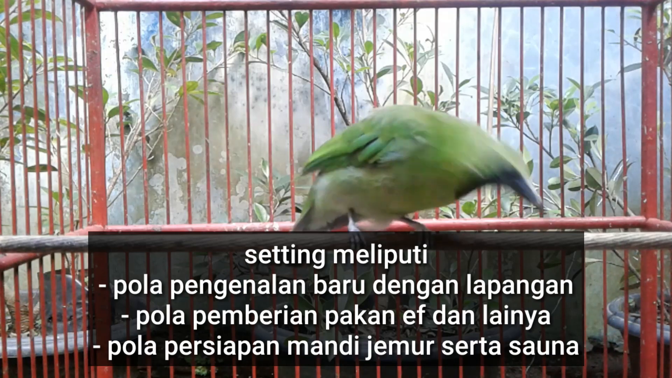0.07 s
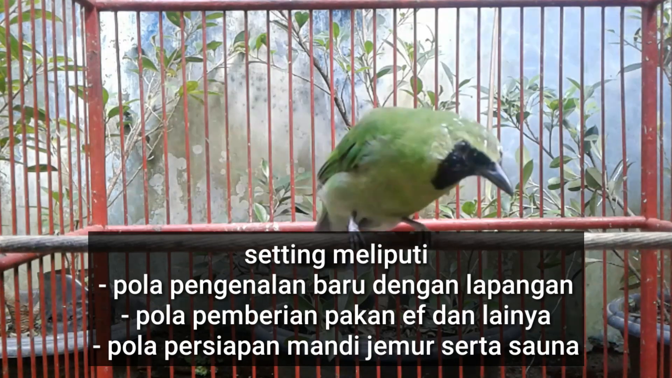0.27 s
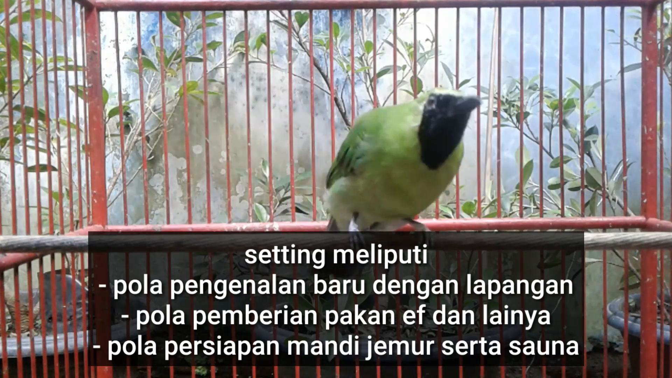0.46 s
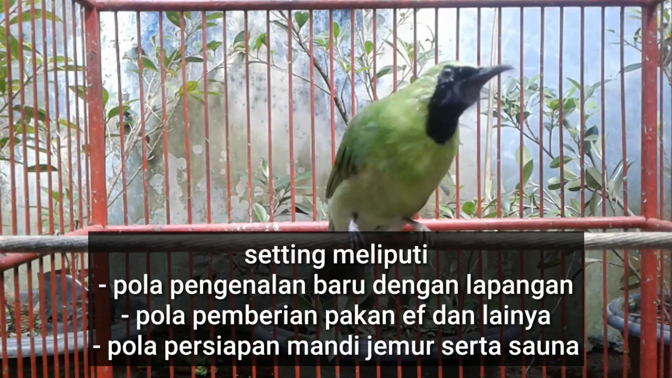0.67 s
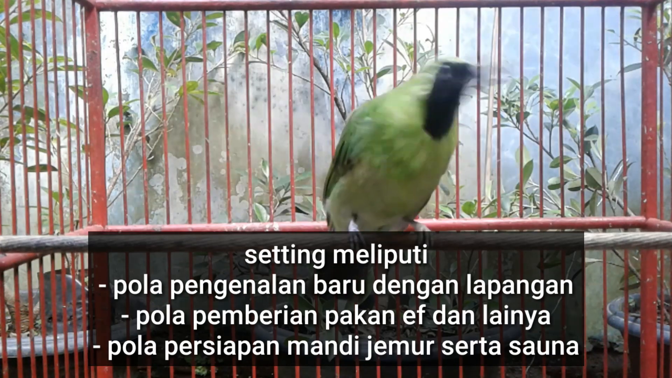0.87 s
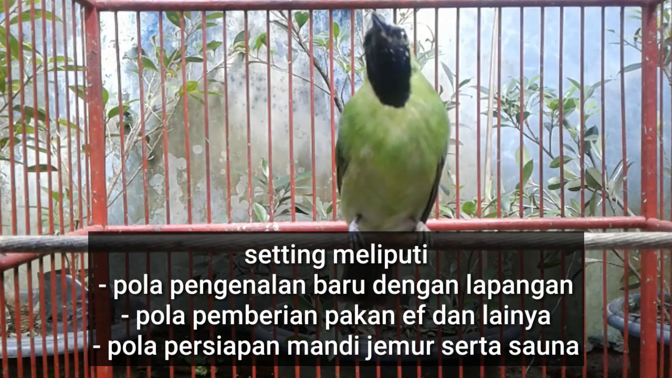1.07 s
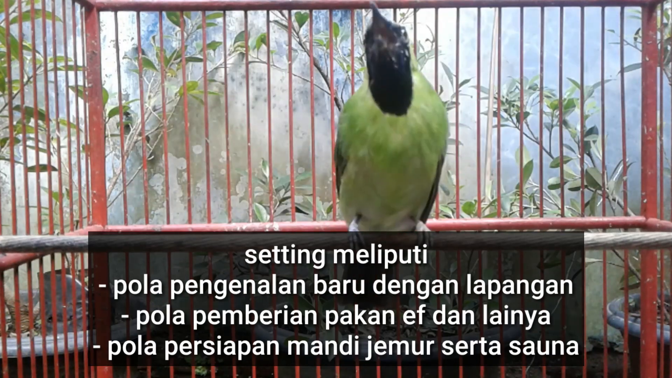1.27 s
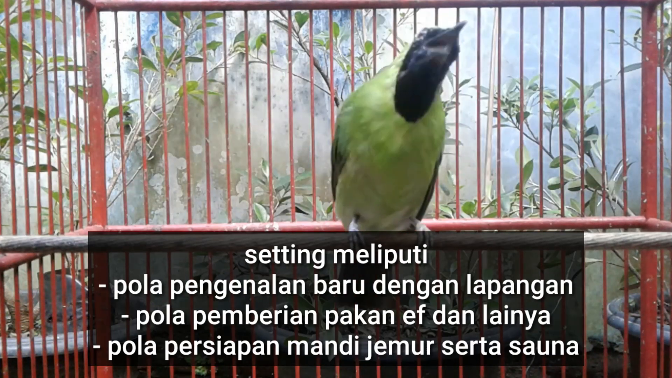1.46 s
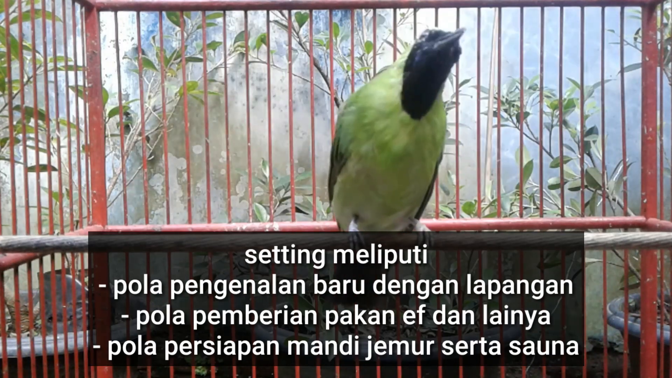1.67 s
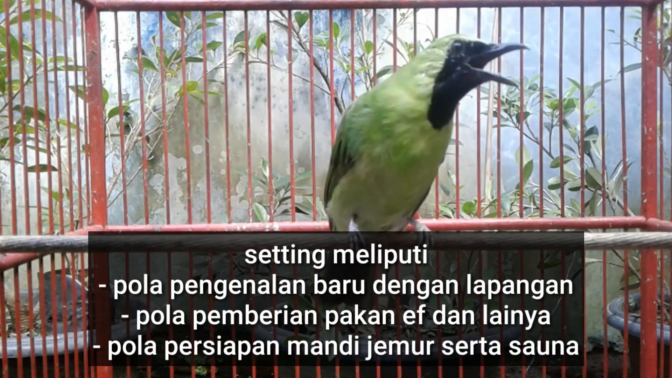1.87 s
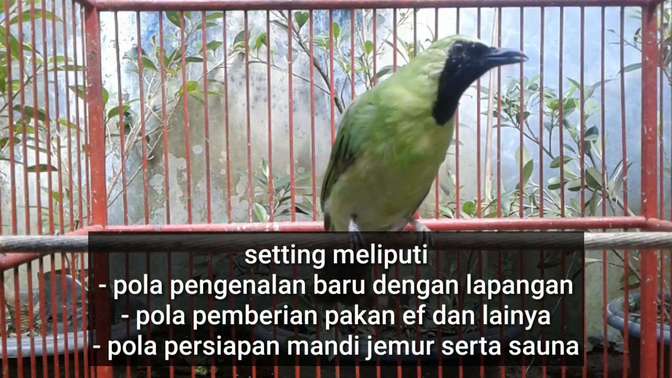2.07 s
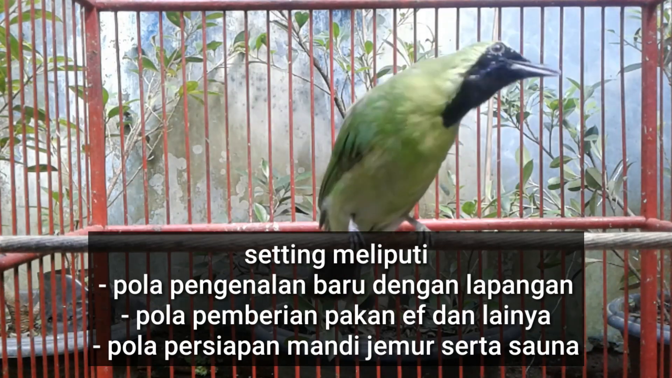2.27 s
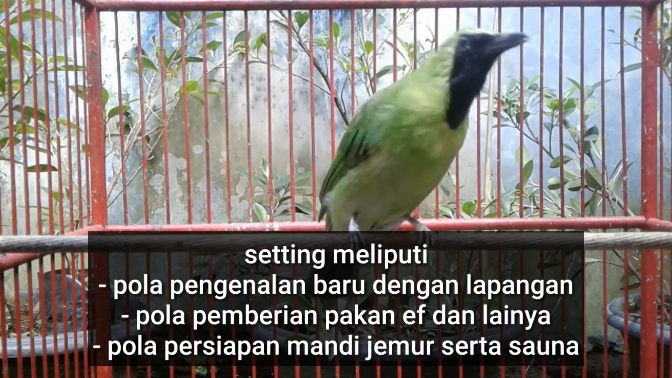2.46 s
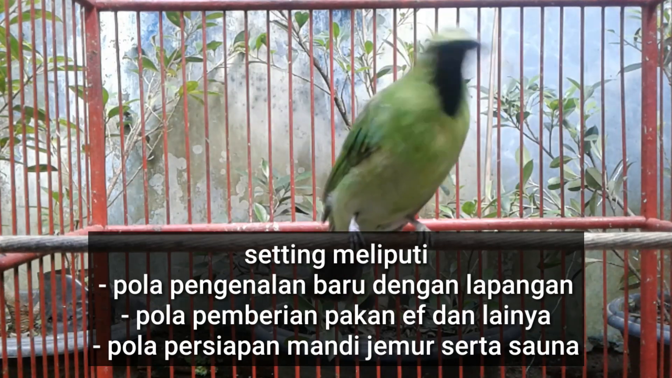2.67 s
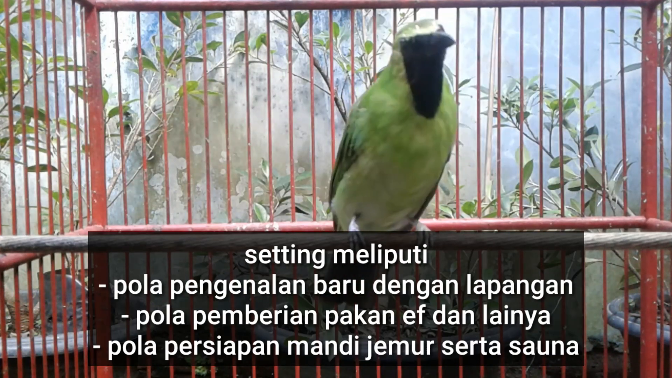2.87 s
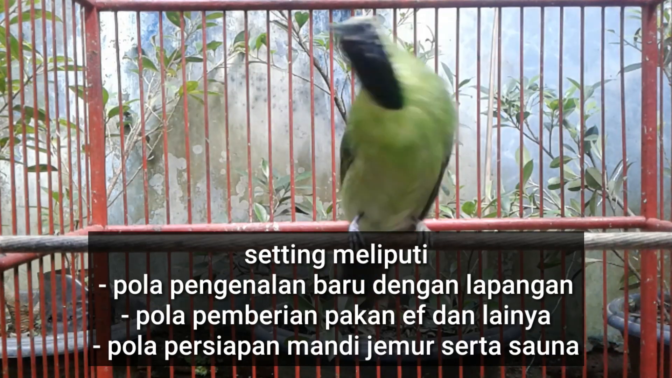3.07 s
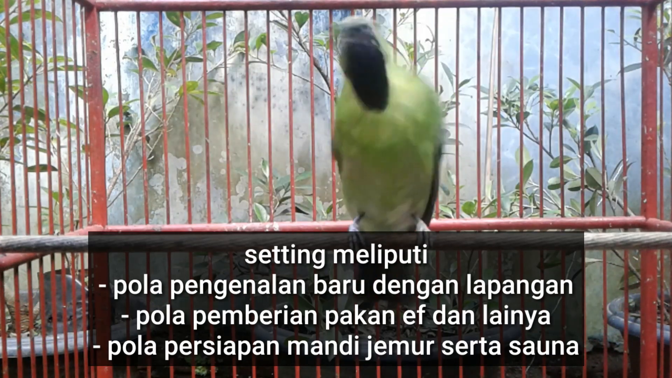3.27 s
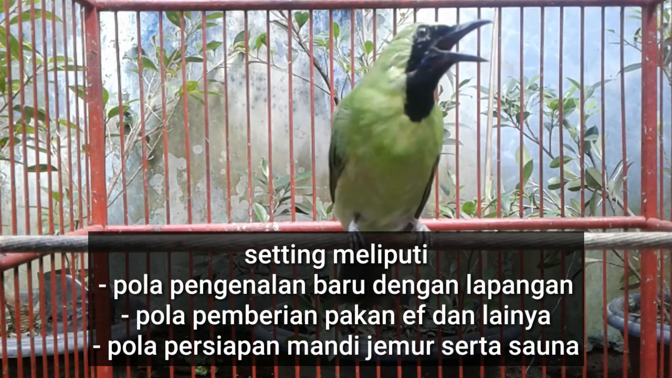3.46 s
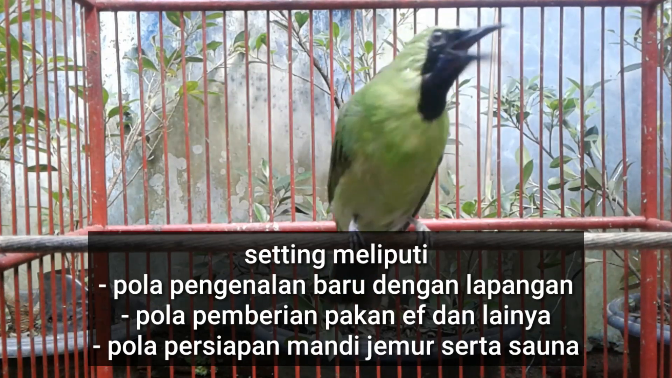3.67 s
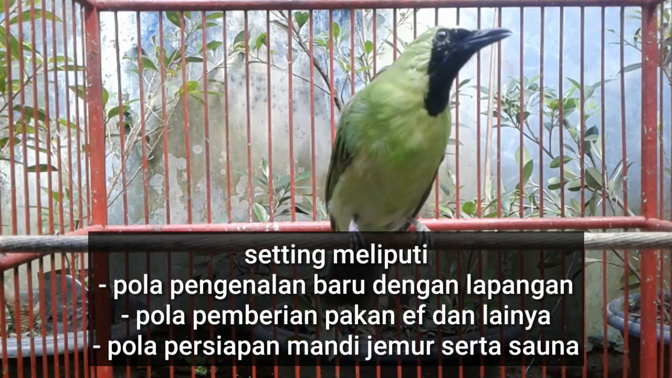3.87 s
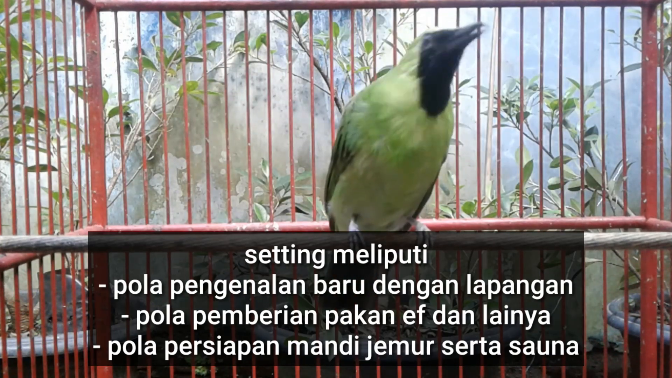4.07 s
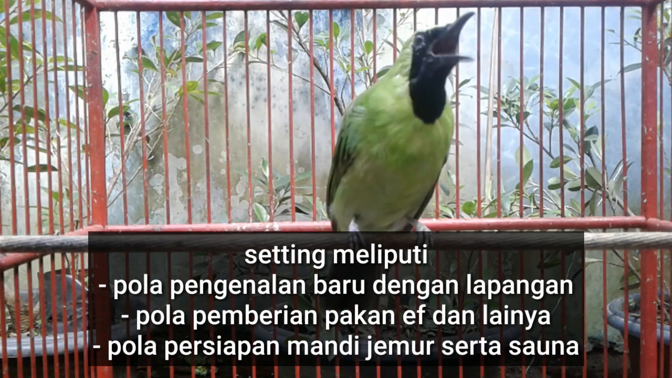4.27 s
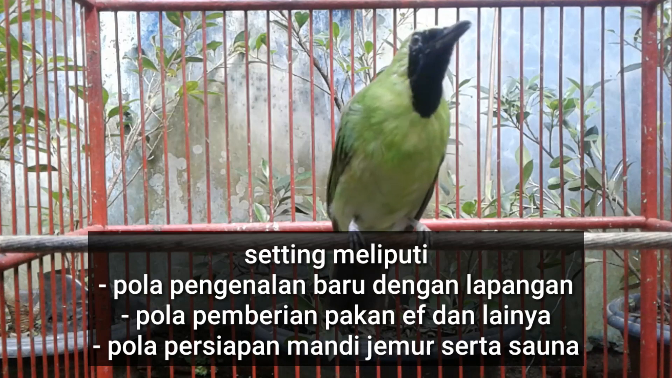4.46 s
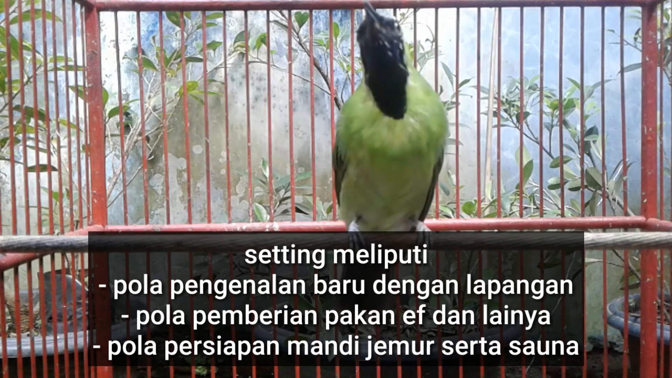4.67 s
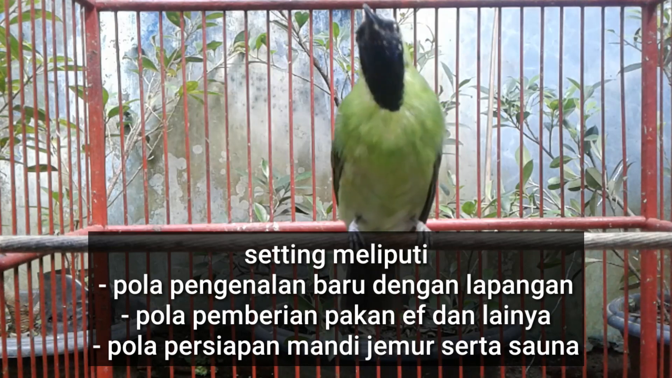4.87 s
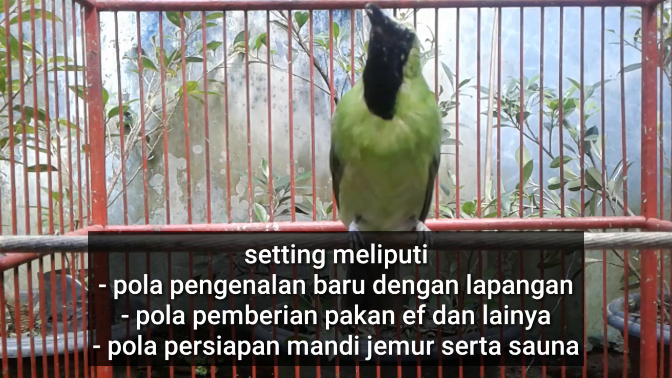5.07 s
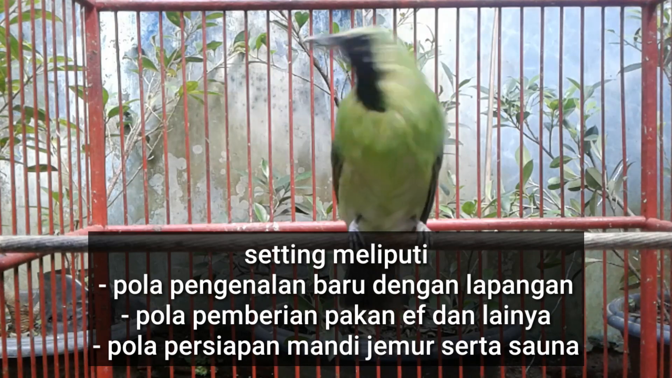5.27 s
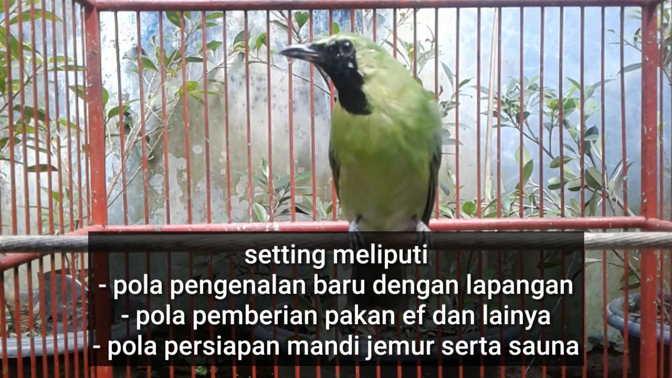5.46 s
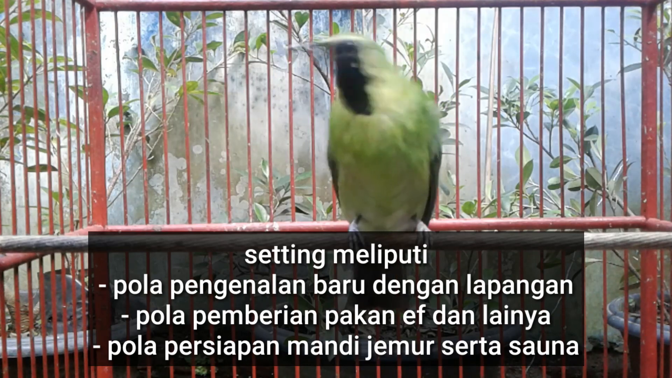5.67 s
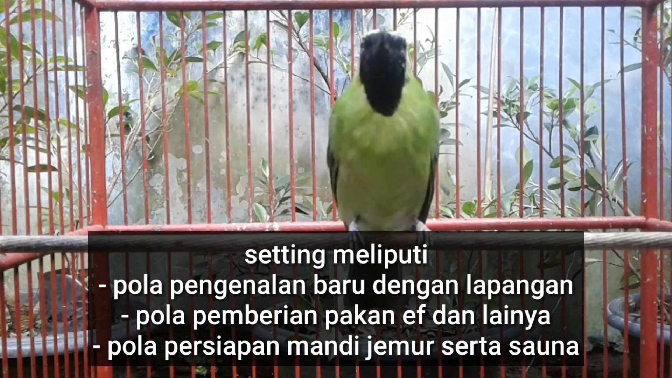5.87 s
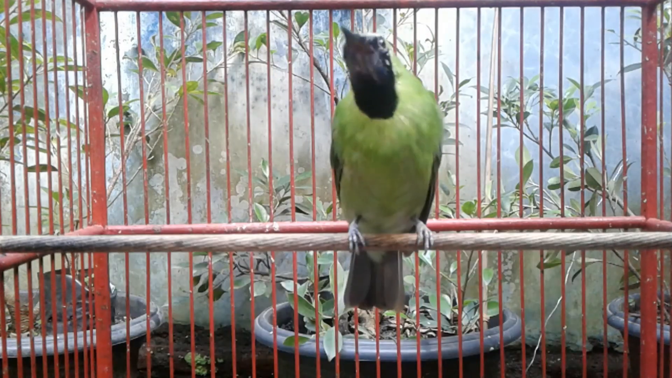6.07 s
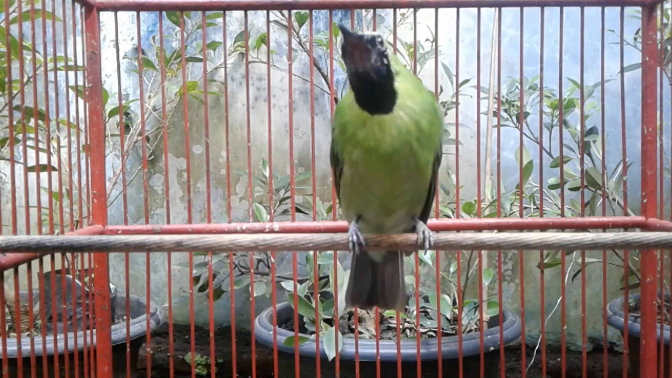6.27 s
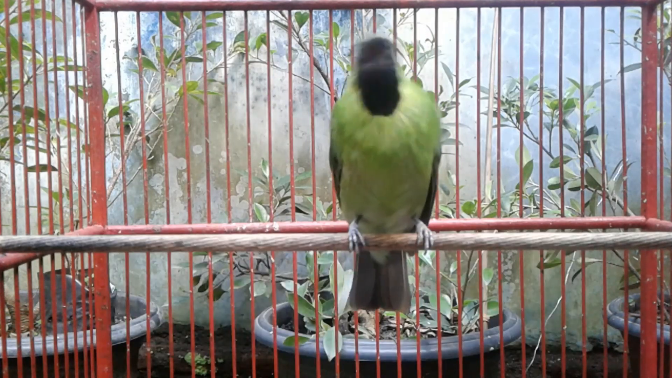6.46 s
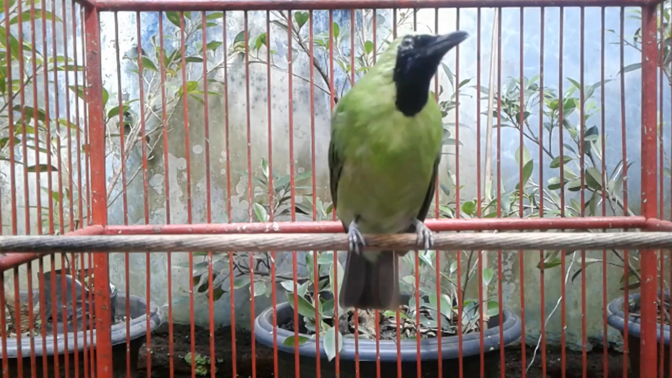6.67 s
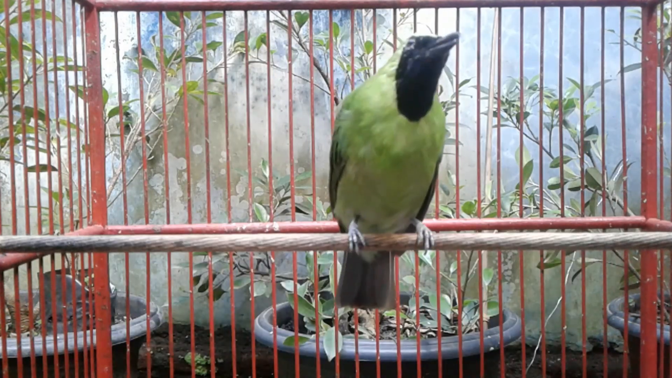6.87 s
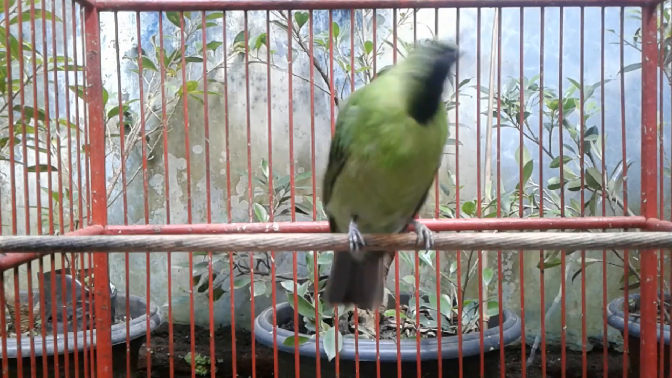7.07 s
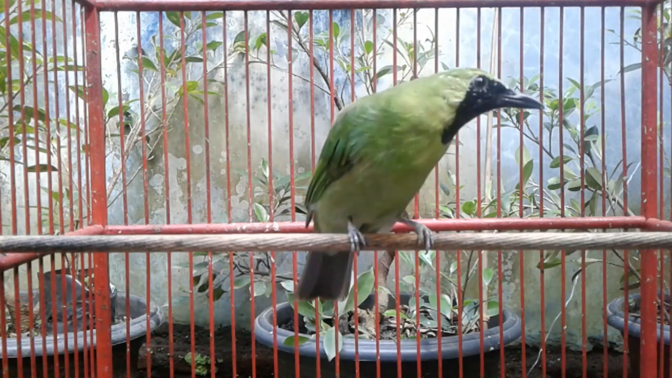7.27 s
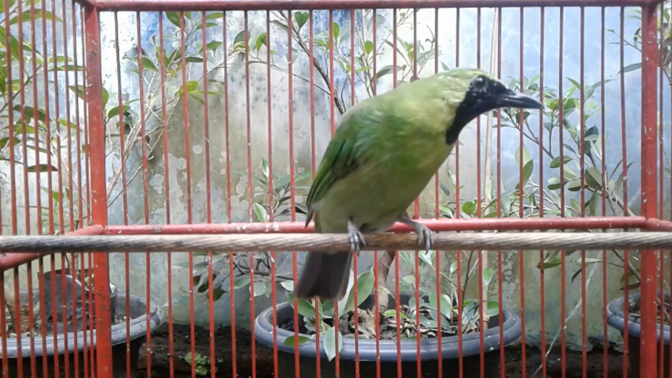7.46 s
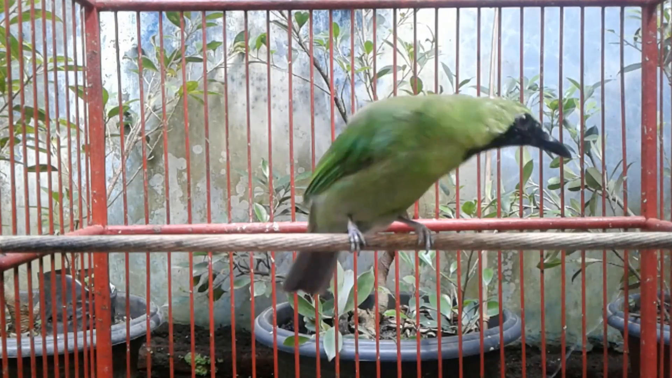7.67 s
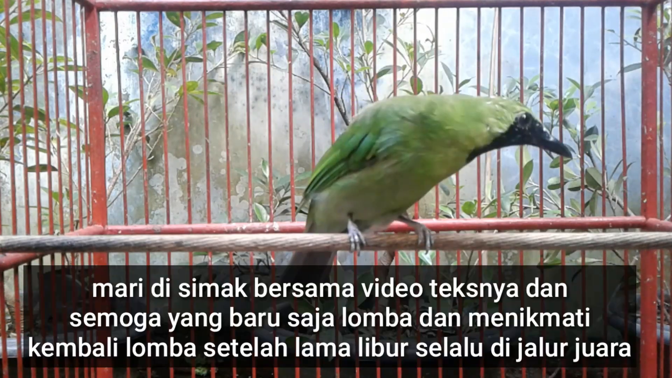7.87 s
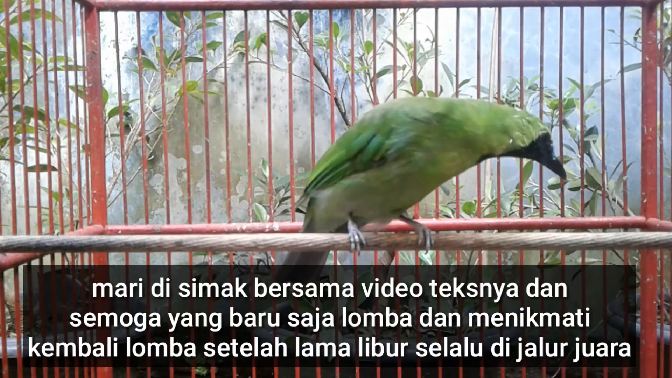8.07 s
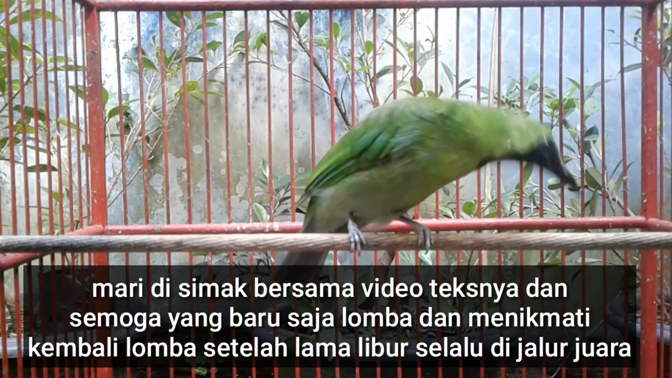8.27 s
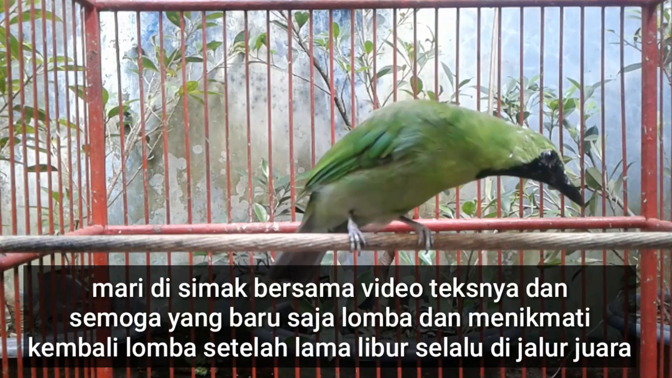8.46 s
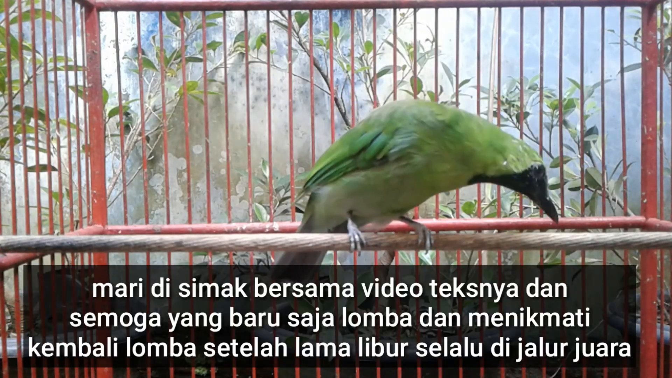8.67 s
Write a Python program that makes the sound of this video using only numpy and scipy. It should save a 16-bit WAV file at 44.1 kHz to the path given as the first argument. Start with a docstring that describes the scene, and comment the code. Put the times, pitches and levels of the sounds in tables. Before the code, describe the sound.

Close, dry outdoor sound with slight wall reflections. One bird delivers loud, pure, sliding whistles about three or four times a second, some flicking upward, some falling, later ones higher and sharper. Faint distant bird chips and a barely audible far rooster sit behind, with a low engine purr dying away and briefly returning faintly. The last second and a half is nearly silent except for small claw taps.

```python
"""A caged songbird, close to the microphone in a walled yard: near-sine whistles and sweeps with
beak-shaped overtones and breath hiss, with filtered-noise beak ticks and claw knocks on perch and bars.
Behind it: other birds' chips with unsteady pitch, a far rooster of two partials, and a small engine of
summed exhaust orders that fades, swells again briefly near 5.3 s, then dies away, over the town's
rumble and hiss of coloured noise."""
import sys
import numpy as np
from scipy import signal
from scipy.fft import rfft, irfft, next_fast_len
from scipy.io import wavfile
from scipy.ndimage import uniform_filter1d, minimum_filter1d, map_coordinates

SR = 44100
rng = np.random.default_rng(int(sys.argv[2]) if len(sys.argv) > 2 else 0)


def generate_wav(sig):
    """Save sig (samples, or channels by samples) to the path in sys.argv[1] as 16-bit PCM at SR."""
    pcm = np.round(np.clip(np.atleast_2d(sig).T, -1, 1) * 32767).astype(np.int16)
    wavfile.write(sys.argv[1], SR, pcm)


N = 384552   # samples

# Street levels over time: time_s, engine_db, rumble_db, air_db
STREET = [(0, -34, -42, -51.5), (.6, -33.5, -41.5, -44.5), (0.721, -40.5, -45, -43.5),
          (1.499, -44, -44.5, -54.5), (3.2, -48.5, -42.5, -60), (4.4, -73, -52.5, -62.5),
          (5.299, -47.5, -51, -61), (8.72, -99.5, -49.5, -65.5)]
# Exhaust order gain: freq_hz, level_db
EXHAUST = [(45, -29), (100, -10), (145, -0.5), (250, -7.5), (400, -20)]
# Town rumble spectrum: freq_hz, density_db_per_hz
RUMBLE = [(18, -51), (30, -25.5), (123, 6.5), (208, -2.5), (279, -10), (348, -5.5), (460, -13.5),
          (1000, -27.5), (1300, -52), (2200, -120)]
# Leaves and air spectrum: freq_hz, density_db_per_hz
AIR = [(900, -12), (4000, -18.5), (8800, -28), (10800, -38.5), (15700, -34)]
# Far rooster, one list per cry: time_s, pitch_hz, first_db, second_db
CROWS = [
    [(.68, 916, -52, -48.5), (1.12, 810, -59.5, -52)],
    [(1.3, 769, -67, -48), (1.75, 758, -47.5, -52.5), (2.08, 730, -68, -60)],
    [(3.22, 843, -59.5, -74.5), (3.95, 819, -62, -83)],
]
# Other birds: start_s, pitch_hz, scatter_share, length_s, level_db, overtone_base_db
CHIPS = [(0.0, 2704, 0.044, 0.082, -45, -13.5), (0.022, 5480, 0.25, 0.097, -40, -10),
         (0.282, 6670, 0.065, 0.17, -47.5, -33), (1.635, 4180, 0.035, 0.021, -34.5, -11),
         (1.645, 6680, 0.023, 0.025, -18, -11.5), (1.643, 5420, 0.11, .02, -34, -30),
         (1.731, 2636, 0.018, 0.016, -34.5, 0), (3.255, 5430, 0.016, 0.071, -48, -27.5),
         (3.611, 5740, 0.1, 0.12, -50, -32.5), (3.891, 5020, 0.2, 0.23, -50.5, -49),
         (4.053, 6330, 0.025, 0.016, -19.5, -14), (4.33, 5723, 0.16, 0.27, -56.5, -23),
         (4.622, 5200, 0.031, 0.035, -42.5, -13), (5.207, 5400, 0.034, 0.055, -43.5, -8.5),
         (6.827, 6400, 0.035, 0.039, -23.5, -11.5), (6.924, 6850, 0.025, 0.023, -19, -19.5),
         (6.988, 2932, 0.006, 0.011, -22, -36.5), (7, 5013, 0.055, 0.037, -16, -14.5),
         (5.88, 4590, 0.052, 0.12, -59.5, -41)]
# Claws shifting on perch and bars: time_s, strength_db
CLAWS = [(7.7794, -22), (7.806, -31), (7.8464, -36), (8.009, -38), (8.199, -39.5)]
# Perch and bar modes: freq_hz, relative_db, t60_s
PERCH_MODES = [(1740, -2.5, 0.028), (3550, 5.5, 0.016)]
# Beak openings: time_s
TICK_TIMES_S = [.607, 0.946, 1.22, 1.468, 1.815, 2.202, 2.517, 2.814, 3.086, 3.360, 3.702, 3.962, 4.167,
                4.620, 4.986, 5.768, 6.048, 6.285, 6.486, 6.792, 7.075]
# Beak and throat response for overtones and hiss: freq_hz, gain_db
BEAK = [(800, -18), (3000, 8.5), (7000, 0), (8900, 13.5), (10500, -14), (12000, -12), (15000, -4.5)]
# Period doubling: start_s, end_s, three_halves_pitch_line_db
DOUBLING = [(1.915, 1.95, -34), (1.978, 2.01, -26)]
# Momentary breaks in the voice: time_s, depth_db
BREAKS = [(.667, -12), (1.559, -20), (2.279, -16), (3.44, -12.5), (4.745, -8), (5.135, -14.5), (6.173, -27)]
# Recurring syllable shapes: length_share, pitch_semitones, relative_db
SWEEP_SHAPE = [(0, -5, -38), (.16, -2, -13.5), (.36, -0.32, -3), (.6, .5, 0.5), (.72, 1.6, -7.5),
               (1, 4.5, -11)]
CHIRP_SHAPE = [(0, -4, -20.5), (.3, -1, -5.5), (.6, -0.5, -0.5), (.85, 2.5, -5.5), (1, -1.7, -7)]
ARCH_SHAPE = [(0, -2.5, -34.5), (.08, -1, -19), (.33, 0.35, -7), (.6, 0.87, -2.5), (.68, 1, 1.5),
              (.75, -1.84, -7.5), (.88, -2.5, -3.5), (1, -5, -36)]
# Where each shape is sung: start_s, length_s, pitch_hz, level_db
SWEEPS = [(1.235, 0.065, 2487, -3.5), (1.477, 0.077, 2423, -5), (1.833, 0.055, 2422, -4),
          (3.728, .046, 2512, 3.5), (4.177, 0.056, 2393, -3)]
CHIRPS = [(2.527, 0.057, 1745, -11), (2.827, 0.063, 1653, -11.5), (3.097, 0.048, 1640, -13.5)]
ARCHES = [(2.218, 0.16, 2023, -4.5), (4.639, 0.15, 2107, -3)]
# Held notes after sweeps, one bend each: start_s, length_s, from_hz, to_hz, level_db, bend_s, bend_hz
HOLDS = [(1.283, 0.08, 3440, 3464, -8.5, 1.307, -210), (1.538, 0.098, 3354, 3505, -5, 1.555, -150),
         (1.88, 0.14, 3378, 3681, -8.5, 1.965, -250), (3.763, 0.05, 3440, 3473, -4, 3.789, -120),
         (4.229, 0.14, 3320, 3456, -6, 4.279, 289.5)]
# Pips: start_s, length_s, from_hz, to_hz, crest_db, overtone_base_db
PIPS = [(3.119, .044, 1760, 1538, -15, -39), (3.708, 0.023, 2610, 2340, -10.5, -40),
        (6.288, 0.023, 5770, 5840, -36.5, 1), (6.311, 0.063, 5392, 5302, -5, -1.5),
        (6.493, 0.045, 5150, 5670, -20, 6), (6.53, 0.041, 5408, 5405, -1.5, -11),
        (7.099, 0.05, 5423, 4870, -4.5, -23)]
# Whistles sung once: overtone_base_db, then rows of time_s, pitch_hz, level_db
WHISTLES = [ (-15, [(.617, 5700, -47), (.634, 5180, -22.5), (.654, 5103, -6.5), (.678, 5320, 1),
            (.698, 5560, -1), (.738, 5483, 0.5), (.758, 5830, -43)]), (-14.5, [(.96, 4220, -32),
            (.99, 4300, -10), (1.009, 4540, -6), (1.036, 4466, -9.5), (1.065, 4630, -5),
            (1.074, 4860, -23.5)]), (-35, [(3.378, 3725, -36.5), (3.393, 3500, -4.5), (3.425, 3345, -4.5),
            (3.45, 3014, -4), (3.48, 3008, -4), (3.578, 2890, 0), (3.589, 2892, -8), (3.599, 3610, -29)]),
            (-40.5, [(5.007, 3265, -40.5), (5.026, 3074, -10), (5.056, 2970, -4), (5.082, 2510, -10),
            (5.098, 2370, -6), (5.15, 2144, -6.5), (5.172, 2007, -4.5), (5.188, 1897, -35)]),
            (-16, [(6.059, 3820, -42), (6.069, 4260, -14), (6.088, 4400, -8), (6.099, 4670, -3.5),
            (6.117, 4610, -14.5)]), (-15.5, [(6.104, 3490, -22), (6.111, 4180, -16), (6.121, 4470, -14),
            (6.136, 4088, 1), (6.158, 4233, -6), (6.168, 4150, -10), (6.188, 4170, -11.5),
            (6.201, 4230, -36)]), (-9.5, [(6.8, 3890, -31), (6.81, 4470, -20.5), (6.826, 4475, -13),
            (6.842, 4810, -8.5), (6.856, 4620, -18), (6.87, 4090, -10)]), (-20.5, [(6.85, 2820, -25),
            (6.863, 3870, -7.5), (6.88, 3960, -7), (6.903, 3990, -10), (6.912, 3950, -29)]), ]

FIRING_HZ = 47.96
YARD_T60_S, YARD_DB, FAR_T60_S = 0.17, -15.5, 0.3
CHIP_SCOOP, CHIP_SCOOP_S = 6.0, 0.0024   # starting flatness in multiples of scatter; time constant
TICK_PEAK_DB = -27
MIDDLE_HZ, CUTOFF_HZ = 3000, 15750
SWELL = 0.85   # below 1: notes swell late and fade early between points
SWEEP_OVER_DB, CHIRP_OVER_DB, ARCH_OVER_DB, HOLD_OVER_DB = -36.5, -35.5, -36, -27.5
HOLD_ATTACK_S, HOLD_RELEASE_S, BEND_S, SILENT_DB = 0.016, 0.0081, 0.015, -33.5
PIP_CREST_SHARE, PIP_HALFWAY_DB = 0.77, -2.5
BREAK_S = 0.006
OVERLOAD_2ND_DB, OVERLOAD_3RD_DB = -32.5, -22.5   # gains on the square and the cube


def amp(db):
    """Decibels to gain."""
    return 10 ** (np.asarray(db) / 20)


def rms_one(x):
    """Scale to unit rms."""
    return x / np.sqrt(np.mean(x ** 2))


def at_hz(points, hz):
    """Read a spectrum, straight on a log-frequency axis."""
    centres, db = np.transpose(points)
    return np.interp(np.log(hz + 1), np.log(centres), db)


def coloured(spectrum):
    """Steady noise of a given spectrum, rms 1."""
    size = next_fast_len(N)
    hz = np.fft.rfftfreq(size, 1 / SR)
    white = rfft(rng.standard_normal(size))
    return rms_one(irfft(white * amp(at_hz(spectrum, hz)), size)[:N])


def drift(rate_hz):
    """Smooth random wander, rms 1."""
    knots = rng.standard_normal(N // 20)
    return rms_one(map_coordinates(knots, [np.arange(N) / SR * 2 * rate_hz], order=3))


def span(start_s, end_s):
    """Sample numbers between two moments."""
    return np.arange(round(start_s * SR), round(end_s * SR))


def along(rows):
    """Sample range of a table and its columns interpolated along it."""
    time_s, *columns = np.transpose(rows)
    n = span(time_s[0], time_s[-1])
    return n, [np.interp(n / SR, time_s, c) for c in columns]


def bandpass(x, low_hz, high_hz):
    """Second-order Butterworth band."""
    return signal.sosfilt(signal.butter(2, [low_hz, high_hz], "band", fs=SR, output="sos"), x)


def lowpass(x, hz):
    """First-order lowpass."""
    return signal.sosfilt(signal.butter(1, hz, fs=SR, output="sos"), x)


def walls(x, t60_s, onset_s):
    """A dense decaying cloud of reflections, duller as it dies; unit energy."""
    t = np.arange(SR // 2) / SR
    cloud = rng.standard_normal(len(t)) * amp(3.1 * rng.standard_normal(len(t)))
    low = lowpass(cloud, 6000)
    low_decay = amp(-60 * t / t60_s) + amp(-19.0 - 30 * t / t60_s)
    tail = low * low_decay + (cloud - low) * amp(-80 * t / t60_s)
    tail = tail * (1 - np.exp(-t / onset_s))
    return signal.fftconvolve(x, tail / np.sqrt(np.sum(tail ** 2)))[:N]


def street():
    """Exhaust orders that fade in and out with the air path, over rumble and a fine hiss."""
    time_s, *columns = np.transpose(STREET)
    engine_db, rumble_db, air_db = [np.interp(np.arange(N) / SR, time_s, c) for c in columns]
    phase = 2 * np.pi * np.cumsum(FIRING_HZ * (1 + 0.017 * drift(1))) / SR
    engine = np.zeros(N)
    for k in range(1, 12):
        order_gain = amp(at_hz(EXHAUST, k * FIRING_HZ) + 2 * drift(3.4))
        engine += order_gain * np.sin(k * phase + 2 * np.pi * rng.random())
    rumble = amp(rumble_db) * coloured(RUMBLE)
    air = amp(2 * drift(2)) * coloured(AIR)
    dull = lowpass(air, 3000)
    treble_db = 0.4 * air_db + 0.51 * air_db.min()   # the treble swells less
    air = amp(air_db) * dull + amp(treble_db) * (air - dull)
    return amp(engine_db) * engine + rumble + air


def rooster():
    """Thin long cries of two wavering partials."""
    out, waver = np.zeros(N), amp(3.3 * drift(15))
    for rows in CROWS:
        n, (hz, first_db, second_db) = along(rows)
        phase = 2 * np.pi * np.cumsum(hz) / SR
        cry = amp(first_db) * np.sin(phase) + amp(second_db) * np.sin(2 * phase)
        out[n] += waver[n] * signal.windows.tukey(len(n), 0.2) * cry
    return out


def neighbours():
    """Short chips scooping up to a rapidly scattered pitch; wall reflections as strong as the direct sound."""
    out, flutter = np.zeros(N), drift(400)
    for start_s, pitch_hz, scatter, length_s, level_db, over_db in CHIPS:
        n = span(start_s, start_s + length_s)
        scoop = min(CHIP_SCOOP * scatter, 0.3) * np.exp((start_s - n / SR) / CHIP_SCOOP_S)
        hz = pitch_hz * (1 + scatter * flutter[n] - scoop)
        phase = 2 * np.pi * np.cumsum(hz) / SR
        tone = np.sin(phase)
        for k in range(2, 7):
            if k * pitch_hz < CUTOFF_HZ:
                partial_db = over_db - 1.3 * (k - 7.5) + at_hz(BEAK, k * pitch_hz)
                tone += amp(partial_db) * np.sin(k * phase)
        out[n] += amp(level_db) * signal.windows.tukey(len(n), 0.3) * tone
    return out + walls(out, FAR_T60_S, onset_s=0.0022)


def claws():
    """Each step knocks the decaying modes of perch and bars and cracks briefly."""
    time_s, strength_db = np.transpose(CLAWS)
    at, out = (time_s * SR).astype(int), np.zeros(N)
    hits = np.full(N, 1e-18)
    for hz, relative_db, t60_s in PERCH_MODES:
        hits[at] = amp(strength_db + relative_db - 16.5 + rng.normal(0, 4.0, len(at)))
        r, w = amp(-60 / (t60_s * SR)), 2 * np.pi * hz / SR
        out += signal.lfilter([0, np.sin(w)], [1, -2 * r * np.cos(w), r * r], hits)
    hits[at] = amp(strength_db - 13)
    decay = signal.lfilter([1], [1, -np.exp(-1 / (0.015 * SR))], hits)
    return out + bandpass(decay * rng.standard_normal(N), 900, 9000)


def ticks():
    """Two dry noise snaps 6 ms apart as the mandibles part."""
    out, t = np.zeros(N), span(0, 0.062) / SR
    second = 0.5 * (t > 0.006) * np.exp(-np.abs(t - 0.006) / 0.00045)
    shape = np.exp(-t / 0.0016) + second
    for time_s in TICK_TIMES_S:
        snap = bandpass(rng.standard_normal(len(t)) * shape, 600, 4000)
        out[round(time_s * SR):][:len(t)] += amp(TICK_PEAK_DB) * snap / np.abs(snap).max()
    return out


def shaped(shape, events, over_db):
    """A recurring shape stretched to each syllable's length, pitch and strength."""
    notes = []
    for start_s, length_s, hz, level_db in events:
        rows = [(start_s + share * length_s, hz * 2 ** (semitones / 12), level_db + relative_db)
                for share, semitones, relative_db in shape]
        notes.append((over_db, rows))
    return notes


def held():
    """Attack, hold, release on a slow glide with one bell-shaped bend."""
    notes = []
    for start_s, length_s, from_hz, to_hz, level_db, bend_s, bend_hz in HOLDS:
        t = np.linspace(0, length_s, num=40)
        bend = bend_hz * np.exp(-((start_s + t - bend_s) / BEND_S) ** 2)
        hz = from_hz + (to_hz - from_hz) * t / length_s + bend
        edge = np.clip(np.minimum(t / HOLD_ATTACK_S, (length_s - t) / HOLD_RELEASE_S), 0, 1)
        db = level_db + SILENT_DB * (1 - edge) ** 2
        notes.append((HOLD_OVER_DB, np.transpose([start_s + t, hz, db])))
    return notes


def pips():
    """A straight glide that swells to its crest and breaks off."""
    envelope = ((0, SILENT_DB), (PIP_CREST_SHARE / 2, PIP_HALFWAY_DB), (PIP_CREST_SHARE, 0), (1, SILENT_DB))
    notes = []
    for start_s, length_s, from_hz, to_hz, crest_db, over_db in PIPS:
        rows = [(start_s + share * length_s, from_hz + share * (to_hz - from_hz), crest_db + relative_db)
                for share, relative_db in envelope]
        notes.append((over_db, rows))
    return notes


def syllables():
    """All syllables: overtone_base_db and rows of time_s, pitch_hz, level_db; second voices follow the first."""
    return (shaped(SWEEP_SHAPE, SWEEPS, SWEEP_OVER_DB) + held()
            + shaped(CHIRP_SHAPE, CHIRPS, CHIRP_OVER_DB)
            + shaped(ARCH_SHAPE, ARCHES, ARCH_OVER_DB) + pips() + WHISTLES)


def song():
    """A near sine from the syrinx, overtones shaped by the beak, and air hiss riding on the effort."""
    out, hiss, wobble = np.zeros(N), coloured(BEAK), drift(50)
    rasp, stutter, flicker = drift(350), drift(120), drift(25)
    half = np.zeros(N)
    for start_s, end_s, half_db in DOUBLING:
        n = span(start_s, end_s)
        half[n] = amp(half_db) * np.sqrt(np.hanning(len(n)))
    t = np.arange(N) / SR
    breaks_db = sum(db * np.exp(-((t - time_s) / BREAK_S) ** 2) for time_s, db in BREAKS)
    for over_db, rows in syllables():
        n, (hz, level) = along([(s, f, amp(db) ** SWELL) for s, f, db in rows])
        hz = uniform_filter1d(hz, size=200)
        octaves_per_s = np.abs(np.gradient(np.log2(hz))) * SR
        strain = np.tanh(octaves_per_s / 8)
        # low glides, upward ones most, run unevenly and roughen as they go
        upward = np.where(np.gradient(hz) > 0, 1, 0.5)
        roughness = strain ** 2 * upward * np.minimum(1, MIDDLE_HZ / hz) ** 2
        roughness = roughness * np.sqrt(np.linspace(0, 1, len(n)))
        # fast glides and high notes leak more air
        hiss_db = -50 + 18 * strain + 9 * np.log2(hz / MIDDLE_HZ)
        if out[n[0]]:   # one side of the syrinx takes over: a spray of air once the pitch has flipped
            spray = np.exp(-((n - n[0]) / (0.032 * SR)) ** 2)
            hiss_db += 12 * spray * (strain < 0.9)
        hz = hz * (1 + 0.0057 * wobble[n] + 0.06 * roughness * rasp[n])
        level = level ** (1 / SWELL) * amp(6 * roughness * np.tanh(stutter[n]))
        phase = 2 * np.pi * np.cumsum(hz) / SR
        tone = np.sin(phase) + amp(hiss_db) * hiss[n]
        effort = np.cbrt(level / level.max())
        for k in range(2, 9):   # overtones need effort, and waver
            swing = effort * amp(4.8 * np.roll(flicker, k * SR)[n])
            partial_db = over_db - 0.57 * (k + 2.0) * (hz / MIDDLE_HZ) ** 2 + at_hz(BEAK, k * hz)
            tone += swing * amp(partial_db) * (k * hz < CUTOFF_HZ) * np.sin(k * phase)
        for k in (1, 3, 5):   # alternate strong and weak cycles put lines between the harmonics
            tone += half[n] * amp(-4.0 * (k - 3.0)) * np.sin(k * phase / 2)
        envelope = uniform_filter1d(level, size=40) * signal.windows.tukey(len(n), 0.04)
        out[n] += amp(breaks_db[n]) * envelope * tone
    return out


def scene():
    """Near sounds with the yard's reflections, far ones behind."""
    far = street() + rooster() + neighbours()
    near = claws() + ticks() + song()
    yard = amp(YARD_DB) * walls(near, YARD_T60_S, onset_s=0.05)
    return (near + yard + far)[None]


def record(dry):
    """Slight microphone distortion mixes overlapping tones; a fast limiter holds peaks; the top is cut."""
    bent = amp(OVERLOAD_2ND_DB) * dry ** 2 + amp(OVERLOAD_3RD_DB) * dry ** 3
    heard = dry + signal.sosfilt(signal.butter(2, 700, "high", fs=SR, output="sos"), bent)
    room_left = np.minimum(1, 0.86 / (np.abs(heard) + 1e-9))
    gain = uniform_filter1d(minimum_filter1d(room_left, size=300), size=150)
    cut = signal.ellip(10, 0.5, 70, CUTOFF_HZ, fs=SR, output="sos")
    return signal.sosfilt(cut, gain * heard)


dry = scene()
out = record(dry)
generate_wav(out)
```